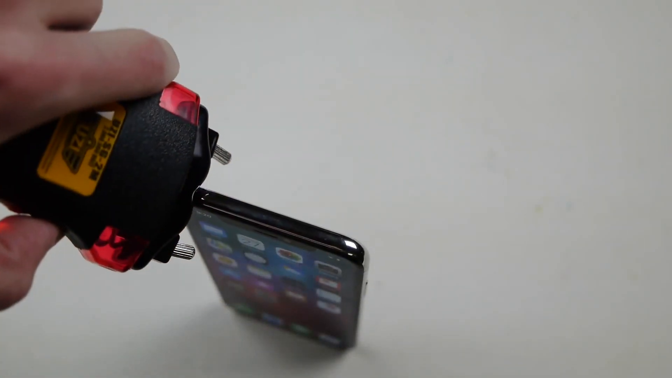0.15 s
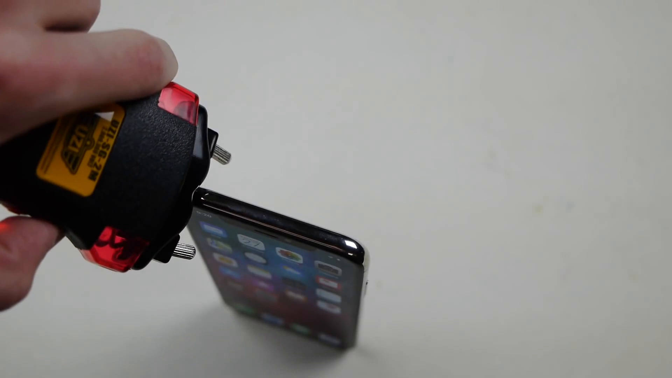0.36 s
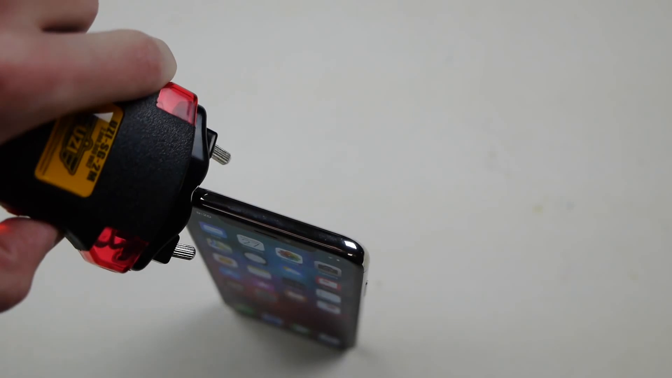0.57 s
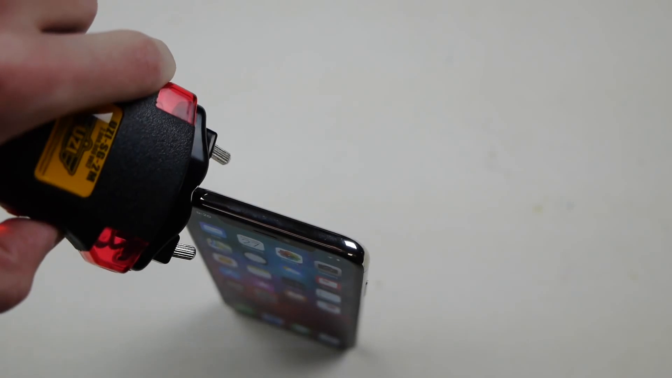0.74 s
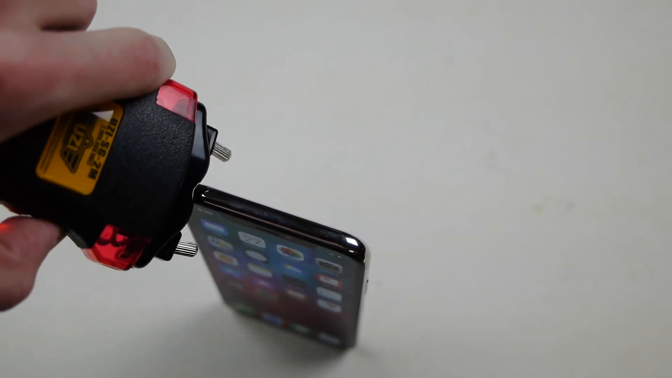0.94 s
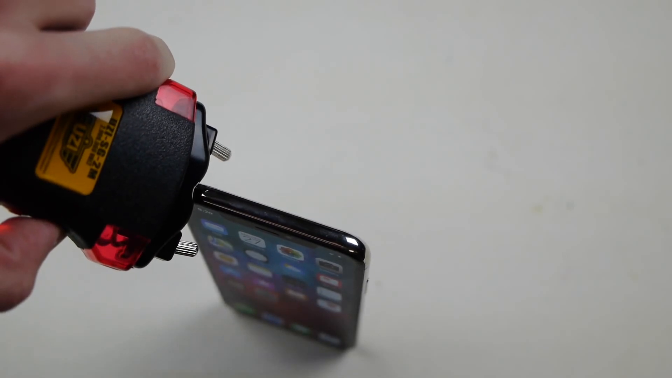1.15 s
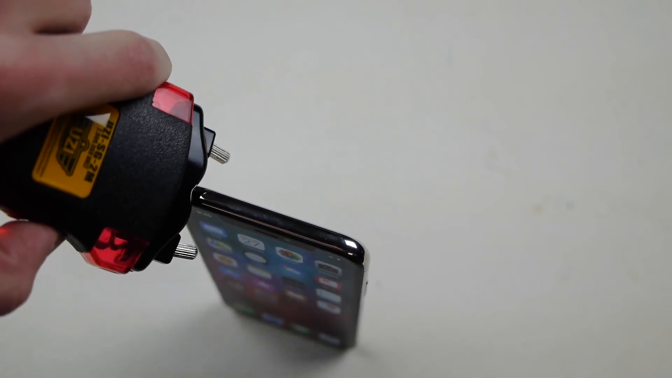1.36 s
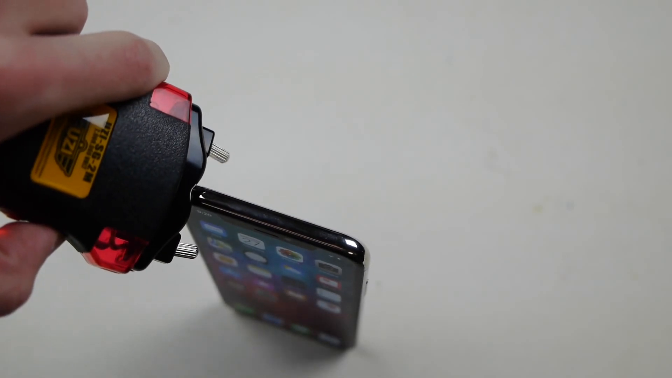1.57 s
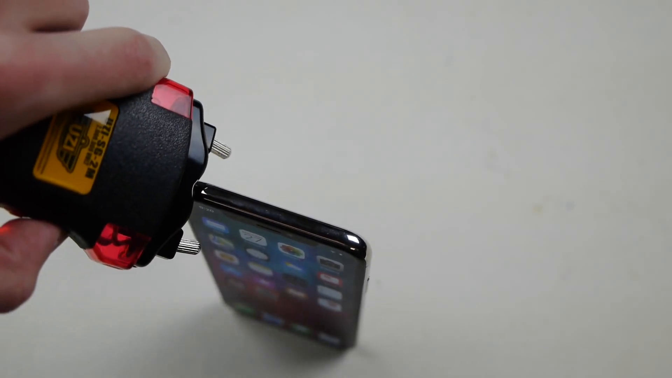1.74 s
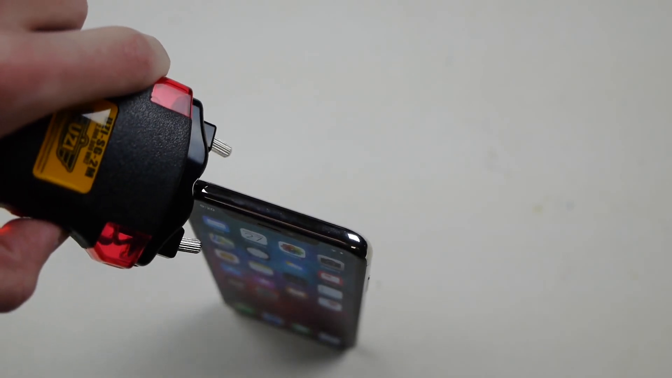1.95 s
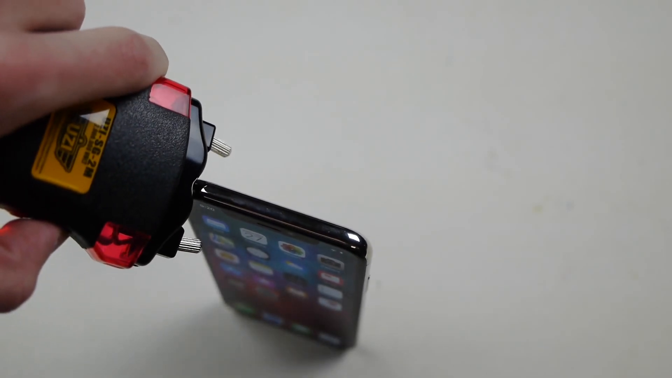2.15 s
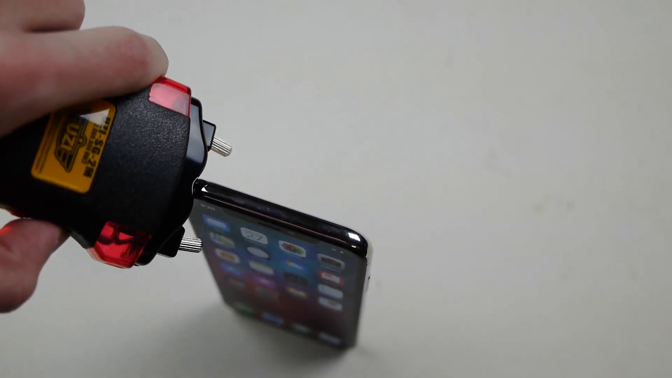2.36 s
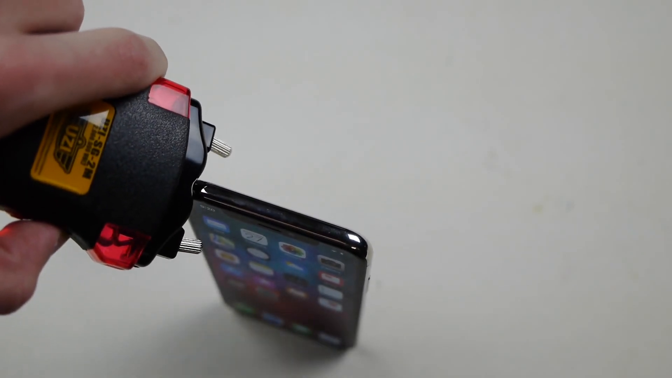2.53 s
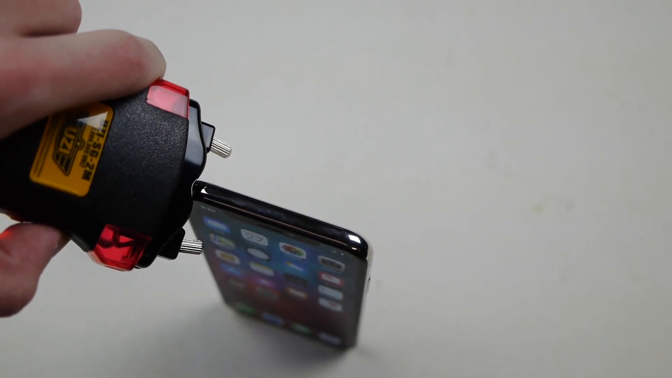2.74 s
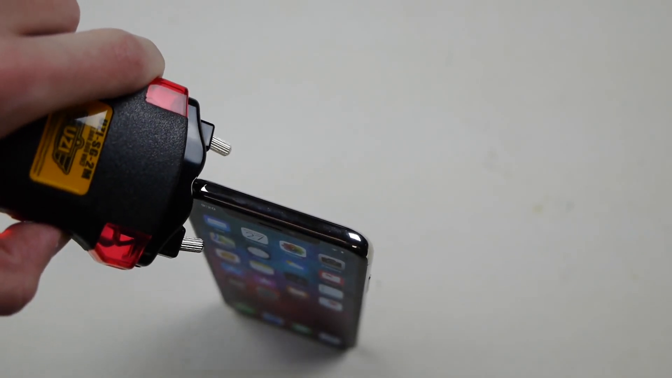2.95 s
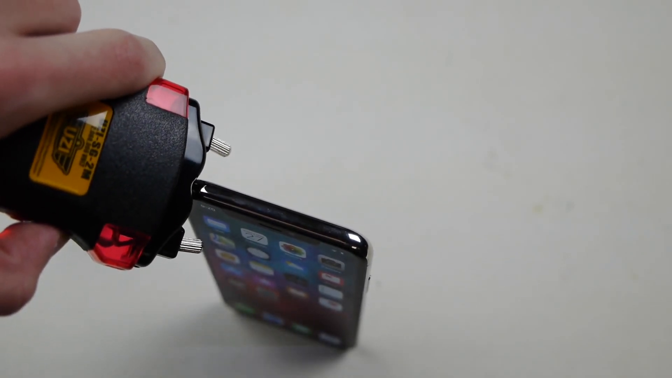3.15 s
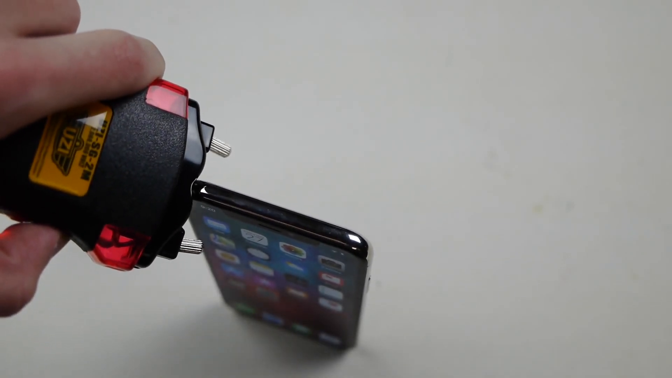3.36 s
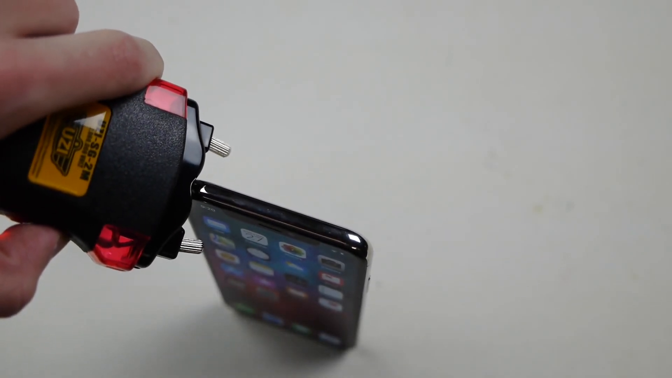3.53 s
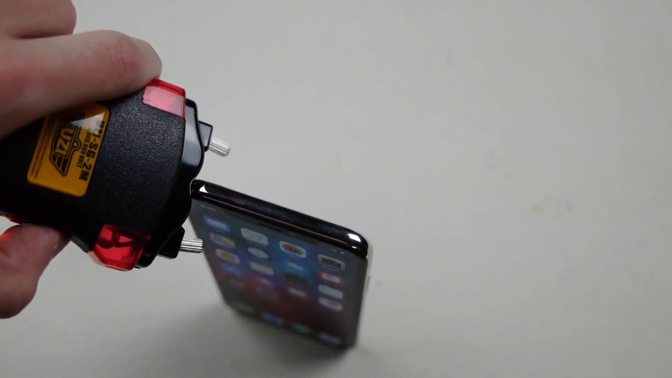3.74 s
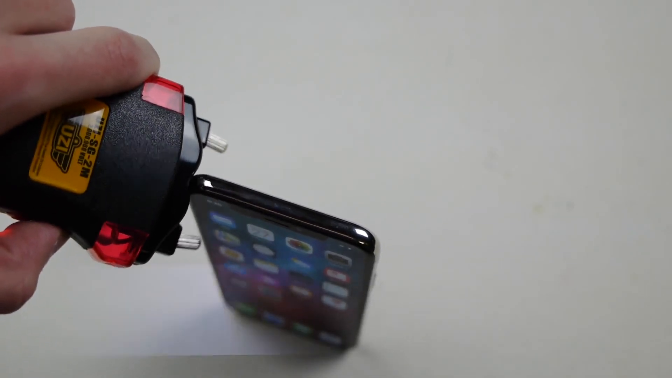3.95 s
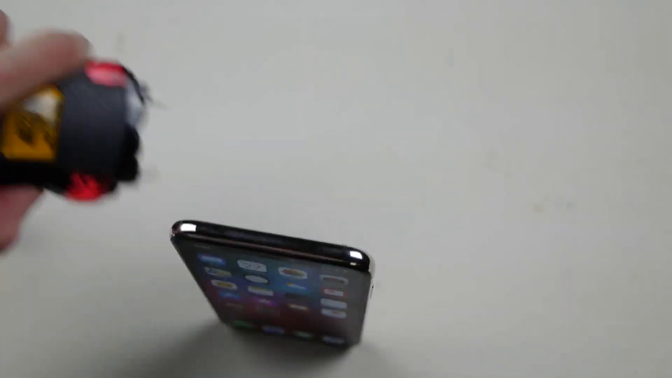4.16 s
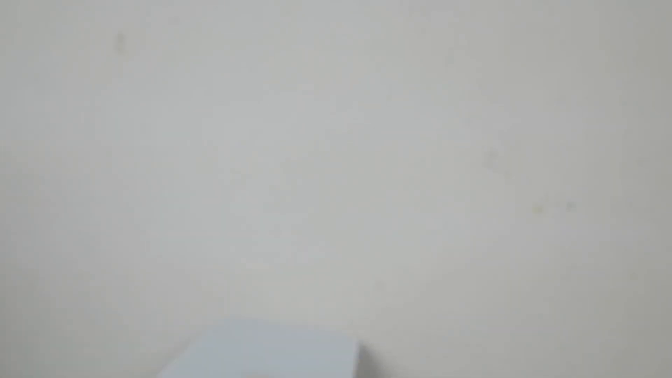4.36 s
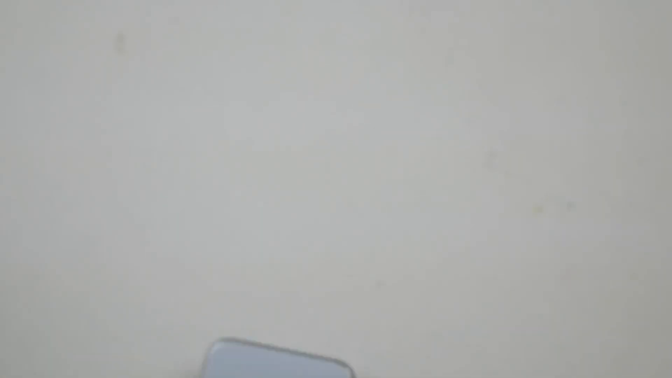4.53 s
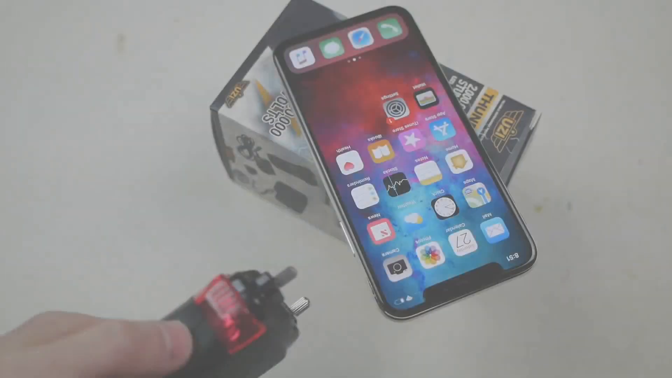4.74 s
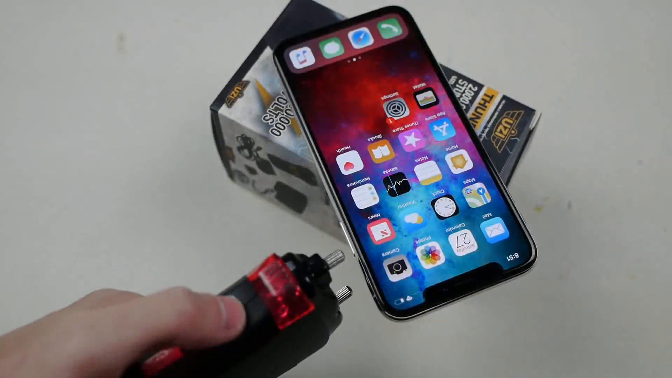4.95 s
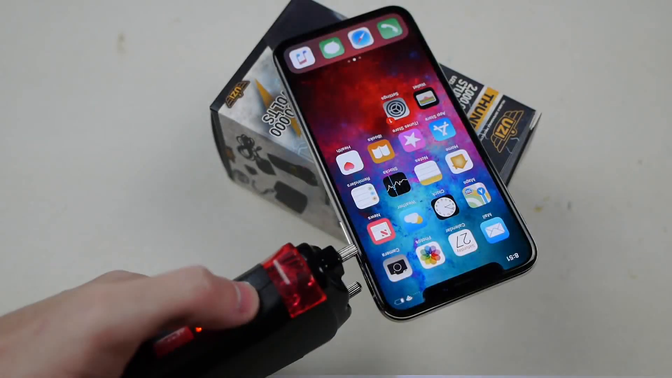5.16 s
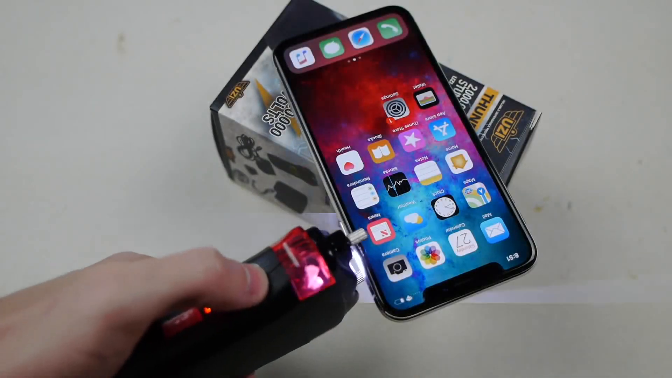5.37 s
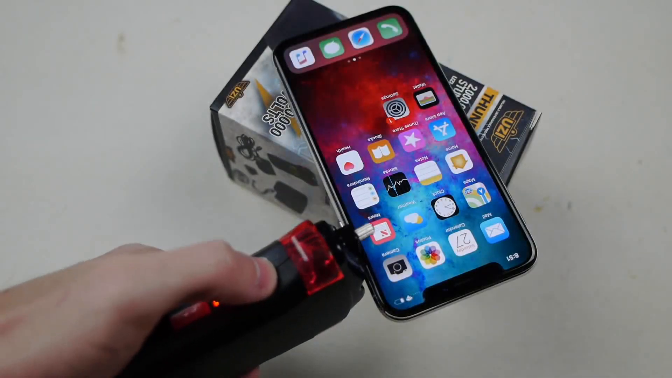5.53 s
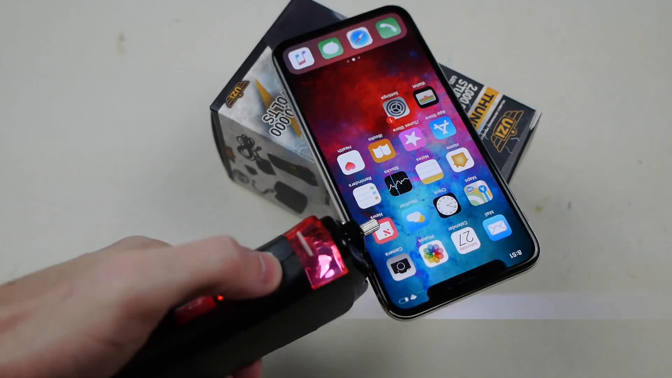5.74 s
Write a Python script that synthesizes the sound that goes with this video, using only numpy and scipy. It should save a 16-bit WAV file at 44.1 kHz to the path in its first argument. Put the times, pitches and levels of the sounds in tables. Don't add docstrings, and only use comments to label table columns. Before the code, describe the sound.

A stun gun crackles in a rapid harsh stream, a slab tips and knocks the table, then a switch clicks and fatter, slower snaps burst out.

```python
import sys
import numpy as np
from scipy import signal
from scipy.fft import rfft, irfft, next_fast_len
from scipy.io import wavfile

SR = 44100
rng = np.random.default_rng(int(sys.argv[2]) if len(sys.argv) > 2 else 0)


def file_out(sig):
    cols = np.atleast_2d(sig).T
    lim = np.clip(cols, -1, 1)
    pcm = np.round(lim * 32767).astype(np.int16)
    wavfile.write(sys.argv[1], SR, pcm)


def volts_from_db(level):
    exponent = np.asarray(level, float) / 20
    return 10 ** exponent


N = 255770
LEAD = SR

# time in [s], sparks fired so far [count].
SPARKS_FIRED = [(-0.9, 0), (0.008, 55), (0.1135, 61), (0.4325, 82), (0.7246, 99), (0.9104, 110),
                (1.1018, 122), (1.4859, 144), (1.8378, 164), (1.9358, 170), (2.1958, 185), (2.359, 196),
                (2.578, 209), (2.9696, 231), (3.1367, 241), (3.555, 264), (3.6628, 270), (4.0034, 288)]
# start in [s], size in [dB], signed microphone pop [full scale].
STRETCHED_SPARKS = [(4.0286, 0.1, -0.033), (4.0524, 0.6, -0.078), (4.0781, 0.5, -0.144),
                    (4.1026, 1.2, -0.126), (4.1298, 2.4, -0.365), (4.1543, 1.2, 0.047), (4.1828, 0.9, 0.02),
                    (4.2082, 1.6, -0.022), (4.238, 1.1, -0.157)]
# start in [s], size in [dB], signed microphone pop [full scale].
CLOSE_SPARKS = [(5.2115, 5.8, -0.302), (5.2383, 4.0, -0.212), (5.27, 1.9, 0.254), (5.2964, 3.6, -0.085),
                (5.3261, 4.8, 0.135), (5.3543, 3.8, -0.183), (5.382, 3.9, -0.181), (5.4091, 3.6, -0.031),
                (5.4396, 3.9, -0.226), (5.4674, 4.7, -0.03), (5.498, 4.0, 0.252), (5.5252, 4.8, -0.059),
                (5.5546, 5.0, -0.068), (5.5869, 6.2, -0.069), (5.6225, 6.0, -0.077), (5.6557, 5.1, -0.074),
                (5.6905, 5.4, -0.096), (5.7226, 4.8, -0.082), (5.7486, 4.3, -0.061), (5.7819, 3.6, -0.075)]

# delay in [ms], left, right and bass levels in [dB].
STILL_PATHS = [(0, 0, -1, -6), (.75, -3.5, -2.5, 5), (1.1, -9, -8, 2), (1.8, -10, -11, -6),
               (3.05, -12, -11, -3), (3.3, -3, -20, -2), (3.45, -7, -12, 3), (3.65, -11, -1.5, 3),
               (5.3, -11, -14, 0), (6.05, -10, -14, -3), (8.5, -8, -7, -10), (9.75, -10, -9, -10),
               (13.8, -9, -9, -8)]
# delay in [ms], left, right and bass
# levels in [dB].
CLOSE_PATHS = [(.1, -1, -1, -2), (.5, -1, 0, 10), (.9, -2, -1, 0), (1.4, -2, -6, -4), (1.9, -3, -5, -8),
               (2.4, -8, -4, -8), (2.8, -8, -4, -10), (3.2, -3, -7, -8), (3.55, -6, -6, -10),
               (3.9, -7, -11, -10), (5.2, -7, -7, -6), (8.2, -10, -9, -6), (13.6, -8, -9, -6)]

# frequency in [Hz], level in [dB per Hz].
STILL_COLOUR = [(24, -70), (45, -18), (190, -11.5), (390, -9), (760, -10), (1400, -9), (2200, -3.5),
                (3100, -7.5), (3700, 0), (5500, -1.5), (9000, 3), (12500, 3.5), (14500, 7), (15600, 4.5)]
# frequency in [Hz], level in [dB per Hz].
STRETCHED_COLOUR = [(180, -51.5), (300, -16), (900, -7), (1600, -4), (2300, -3.5), (7900, 4), (15600, 5)]
# frequency in [Hz], level in [dB per Hz].
CLOSE_COLOUR = [(35, -74), (110, -34.5), (280, -7), (700, 1), (1100, -1.5), (1800, -7), (2300, -3),
                (2700, 4), (4400, 0), (6000, 2), (7000, 4), (8500, 3.5), (15600, 1.5)]

# start in [s], peak, crack and thud levels in [dB].
TABLE_KNOCKS = [
    (4.5989, -19, -19, -26),
    (4.623, -32, -30, 13),
    (4.694, -33, -30, -15),
    (4.858, -60, -30, 20),
    (4.94, -62, -14, -8),
]
# frequency in [Hz], level in [dB], 60 dB decay in [s].
TABLE_MODES = [(110, -15.5, 0.39), (225, -17, 0.11), (390, -16, 0.035), (480, -7.5, 0.03), (514, -7, 0.046),
               (744, -11, 0.043), (1320, -18, 0.041)]
# start in [s], peak in [dB].
SWITCH_CLICKS = [
    (5.1864, -35),
    (5.187, -25),
]
# frequency in [Hz], level in [dB], 60 dB decay in [s].
CASE_MODES = [(770, -12, 0.021), (1820, -16, 0.011), (2780, -7, 0.0078), (4100, -6.5, 0.0083)]

# frequency in [Hz], 60 dB decay in [s].
ROOM_DECAY = [(100, 0.78), (500, 0.4), (2000, 0.5), (5400, 0.48), (7700, 0.32), (11000, 0.34), (15000, 0.2)]
# frequency in [Hz], level in [dB].
WALL_COLOUR = [(100, -7), (400, -11), (1000, -10), (2300, -9), (4500, -5), (8000, 0), (15000, 0)]
# frequency in [Hz], correlation [0 to 1].
LIKENESS = [(130, 0.047), (300, 0.85), (640, 0), (1400, 0.39), (3100, 0.3), (15000, 0)]

# time in [s], gain in [dB].
FADE = [
    (4.62, 0),
    (4.72, -2),
    (4.81, -7),
    (4.88, -30),
]
# time in [s], level in [dB].
AIR_LEVEL = [(0, -68), (4.3, -70), (4.6, -80), (4.79, -79), (4.9, -65), (5.15, -61.5), (5.8, -66)]
# frequency in [Hz], level in [dB per Hz].
AIR_COLOUR = [(40, -60.5), (80, -29), (200, -19), (450, -20), (800, -29), (1500, -33), (11000, -38.5),
              (15500, -43.5), (16000, -69.5)]
# frequency in [Hz], level in [dB].
HUM_LINES = [(113.0, -76.5), (231.5, -74.5), (317.6, -75), (522.2, -73.5), (1044, -81.5)]
# time in [s], gain in [dB].
HUM_LEVEL = [
    (4.83, -28),
    (4.87, -2),
    (5.15, 0),
]

WAIT_SCATTER, DB_PER_WAIT, SIZE_SCATTER_DB = 0.09, 6, 0.9
WANDER_DB = 1.5
SPACING_MS, TURN_PER_PATH = 0.035, 2.4
POPS_END_S = 5.51
GRUMBLE_MS, GRUMBLE_LOW_HZ, GRUMBLE_HIGH_HZ = 19.6, 130, 600
CRACK_T60_S = 0.049
FULL_SCALE, KNEE, TOP_HZ = 0.8, 6, 15850


def steady_sparks():
    s, fired = np.transpose(SPARKS_FIRED)
    luck = rng.standard_normal((int(fired[-1]) + 1, 2))
    waited = np.cumsum(1 + WAIT_SCATTER * luck[:, 0])
    when = np.interp(waited, waited[fired.astype(int)], s)
    size_db = DB_PER_WAIT * WAIT_SCATTER * luck[:, 0] + SIZE_SCATTER_DB * luck[:, 1]
    return np.transpose([when, size_db])


def needles(times, heights):
    return np.bincount(np.round(times * SR).astype(int) + LEAD, heights, N + LEAD)


def arc(sparks, paths, colour, level_db, wet_db, moved, blur_db, blur_ms, bass_hz):
    ms, left_db, right_db, bass_db = np.transpose(paths)
    when = (sparks[:, :1] + ms / 1000).ravel()
    wander_db = WANDER_DB * rng.standard_normal((len(sparks), len(ms)))
    size_db = level_db + sparks[:, 1:2] + wander_db
    path_number = 1 + np.arange(len(ms))
    lead = np.tile(SPACING_MS / 1000 * np.sin(TURN_PER_PATH * path_number), len(sparks))

    def arrivals(left_way, right_way, extra_db):
        left = needles(when + left_way * lead, -volts_from_db(size_db + left_db + extra_db).ravel())
        right = needles(when + right_way * lead, -volts_from_db(size_db + right_db + extra_db).ravel())
        return np.array([left, right])

    def low(hz):
        return 1 / (1 + (hz / bass_hz) ** 4)

    full = arrivals(0.84, -1.2, 0)
    bass = arrivals(0.7, -0.59, bass_db)
    t = np.arange(200) / SR
    trail = volts_from_db(blur_db - 60 * t / (blur_ms / 1000))[None]
    scatter = signal.fftconvolve(full, trail, axes=1)[:, :N + LEAD]
    full = full + scatter * rng.standard_normal(full.shape)
    wet = room(needles(sparks[:, 0], volts_from_db(sparks[:, 1] + level_db + wet_db)), moved)

    heard = filtered(full, lambda hz: 1 - low(hz)) + filtered(bass, low)
    heard = heard + filtered(wet, lambda hz: volts_from_db(along(WALL_COLOUR, hz)))
    return filtered(heard, lambda hz: volts_from_db(along(colour, hz)))[:, LEAD:]


def pops(sparks, gain_db, lag_ms, width_ms, edge_hz, cut_hz, damping, wet_db, grumble_db):
    when = sparks[:, 0] + lag_ms / 1000
    uneven_db = WANDER_DB / 4 * rng.standard_normal(len(sparks))
    train = np.array([needles(when, sparks[:, 2] * volts_from_db(gain_db + way * uneven_db)) for way in (1, -1)])

    def shape(hz):
        u = 1j * hz / cut_hz
        step = width_ms * SR / 1000 * 1.58 / (1 + 2j * np.pi * hz * 0.25 * width_ms / 1000)
        step = step / (1 + 1j * hz / edge_hz)
        return step * u * u / (1 + damping * u + u * u)

    popped = filtered(train + volts_from_db(wet_db) * room(train[0], moved=0.99), shape)
    return (popped + grumble(train, grumble_db))[:, LEAD:]


def grumble(train, level_db):
    window = np.hanning(round(2 * GRUMBLE_MS * SR / 1000))[None]
    swell = signal.fftconvolve(np.abs(train), window, "same", axes=1)
    swell = swell * (np.cumsum(np.abs(train), axis=1) > 0)

    def band(hz):
        return 1 / (1 + (GRUMBLE_LOW_HZ / (hz + 1)) ** 2) / (1 + (hz / GRUMBLE_HIGH_HZ) ** 4)

    return filtered(volts_from_db(level_db) * swell * pair(train.shape[1]), band)


def steady_arc():
    return arc(steady_sparks(), STILL_PATHS, STILL_COLOUR, level_db=-3.0, wet_db=7.0, moved=0.44,
               blur_db=-19, blur_ms=3, bass_hz=2800)


def stretched_arc():
    rows = np.array(STRETCHED_SPARKS)
    snaps = arc(rows, CLOSE_PATHS, STRETCHED_COLOUR, level_db=-7.0, wet_db=16.0, moved=1.0,
                blur_db=-10, blur_ms=5.1, bass_hz=2820)
    return snaps + pops(rows, gain_db=3.0, lag_ms=0.72, width_ms=0.67, edge_hz=320, cut_hz=126,
                        damping=1.0, wet_db=-34, grumble_db=-0.5)


def close_arc():
    rows = np.array(CLOSE_SPARKS)
    snaps = arc(rows, CLOSE_PATHS, CLOSE_COLOUR, level_db=-4.5, wet_db=11.5, moved=0.92,
                blur_db=-7.5, blur_ms=2.42, bass_hz=2840)
    near = rows[rows[:, 0] < POPS_END_S]
    return snaps + pops(near, gain_db=-0.5, lag_ms=0.37, width_ms=1.0, edge_hz=344, cut_hz=120,
                        damping=0.94, wet_db=-39, grumble_db=-2.5)


def strike(s, modes, peak_db, crack_db, thud_db, crack_hz):
    out = np.zeros(N + SR)
    t = np.arange(SR // 2) / SR
    hz, db, t60 = np.transpose(modes)
    db = db + rng.normal(0, 2.4, len(hz)) + thud_db * (hz == hz.min())
    decay = volts_from_db(db[:, None] - 60 * t / t60[:, None])
    ring = np.sum(decay * np.sin(2 * np.pi * hz[:, None] * t), axis=0)
    grit = volts_from_db(crack_db + 23 - 60 * t / CRACK_T60_S) * rng.standard_normal(len(t))
    crack = filtered(grit, lambda f: 1j * f / (350 + 1j * f) / (1 + 1j * f / crack_hz) ** 2)
    out[round(s * SR):][:len(t)] = volts_from_db(peak_db) * (ring + crack)
    return out[:N]


def knocks():
    dry = sum(strike(s, TABLE_MODES, peak_db, crack_db, thud_db, crack_hz=3180)
              for s, peak_db, crack_db, thud_db in TABLE_KNOCKS)
    return dry + volts_from_db(-6.5) * room(dry, moved=1.0) * volts_from_db(curve(FADE))


def switch():
    click = sum(strike(s, CASE_MODES, peak_db, crack_db=-37, thud_db=3, crack_hz=6000)
                for s, peak_db in SWITCH_CLICKS)
    return click + volts_from_db(-4.5) * room(click, moved=0.41)


def room_tone():
    air = filtered(pair(N), lambda hz: volts_from_db(along(AIR_COLOUR, hz)))
    t = np.arange(N) / SR
    drift = np.cumsum(rng.standard_normal((len(HUM_LINES), N)), axis=1) * 0.012
    hum = sum(volts_from_db(db + 7.5) * np.sin(2 * np.pi * hz * t + d) for (hz, db), d in zip(HUM_LINES, drift))
    return volts_from_db(curve(AIR_LEVEL)) * air / np.std(air) + volts_from_db(curve(HUM_LEVEL)) * hum


def room(x, moved):
    out = np.zeros((2, len(x) + 2 * SR))
    hop = SR // 4
    still = tail()
    for a in range(0, len(x), hop):
        if np.any(x[a:a + hop]):
            answer = np.sqrt(1 - moved) * still + np.sqrt(moved) * tail()
            part = signal.fftconvolve(x[None, a:a + hop], answer, axes=1)
            out[:, a:a + part.shape[1]] += part
    return out[:, :len(x)]


def tail(build_s=0.0075):
    hz, t, z = signal.stft(pair(SR), SR, nperseg=256)
    decay = volts_from_db(-60 * t / along(ROOM_DECAY, hz)[:, None])
    x = signal.istft(z * decay, SR, nperseg=256)[1]
    x = x * (1 - np.exp(-np.arange(x.shape[1]) / SR / build_s))
    return x / np.sqrt(np.sum(x ** 2) / 2)


def pair(length):
    def mid_side(hz):
        turn = np.arccos(along(LIKENESS, hz)) / 2
        return np.array([np.cos(turn), np.sin(turn)])

    mid, side = filtered(rng.standard_normal((2, length)), mid_side)
    return np.array([mid + side, mid - side])


def along(points, hz):
    f, v = np.transpose(points)
    return np.interp(np.log(hz + 1), np.log(f + 1), v)


def curve(rows):
    return np.interp(np.arange(N) / SR, *np.transpose(rows))


def filtered(x, response):
    m = next_fast_len(x.shape[-1] + 8192)
    return irfft(rfft(x, m) * response(np.fft.rfftfreq(m, 1 / SR)), m)[..., :x.shape[-1]]


def scene():
    first = (steady_arc() + stretched_arc()) * volts_from_db(curve(FADE))
    table = knocks()
    second = switch() + close_arc()
    return first + table + second + room_tone()


def roll_off(x):
    return signal.sosfilt(signal.butter(12, 16990, fs=SR, output="sos"), x)


def record(dry):
    soft = dry / (1 + np.abs(dry / FULL_SCALE) ** KNEE) ** (1 / KNEE)

    def band(hz):
        low_cut = 1j * hz / (22 + 1j * hz)
        return np.clip((TOP_HZ - hz) / 100, 0, 1) * low_cut

    return roll_off(filtered(soft, band))


dry = scene()
out = record(dry)
file_out(out)
```